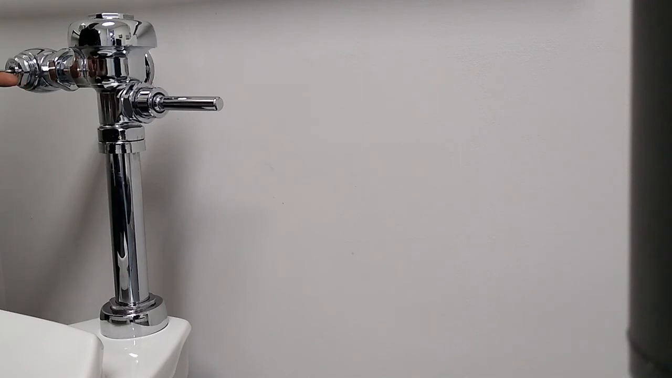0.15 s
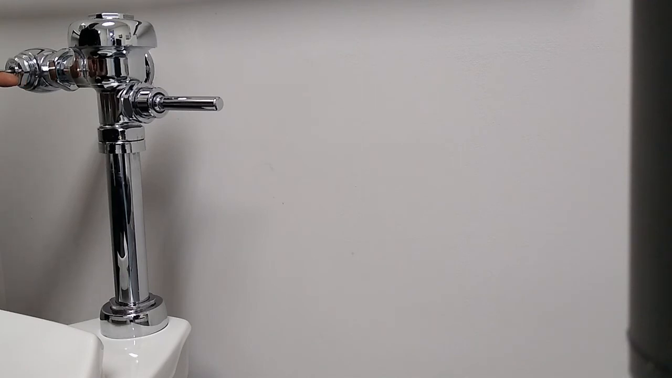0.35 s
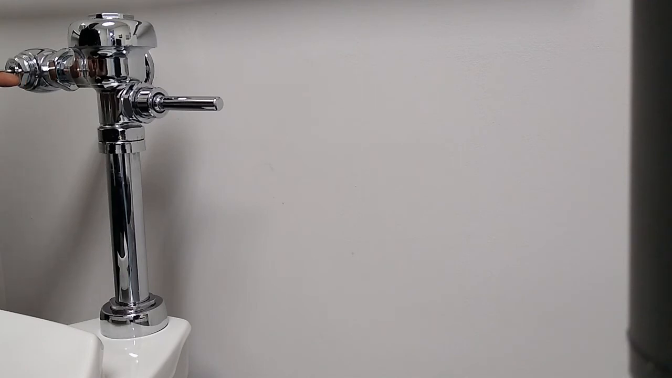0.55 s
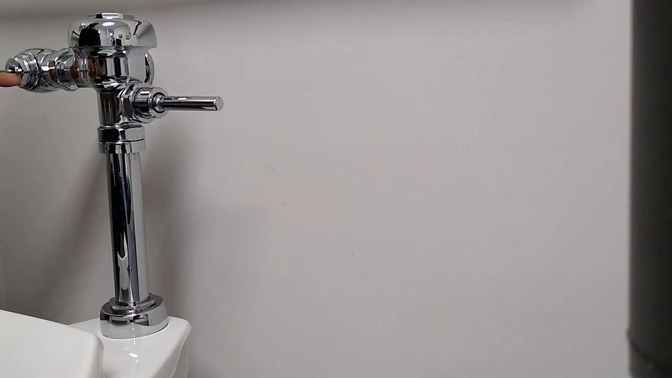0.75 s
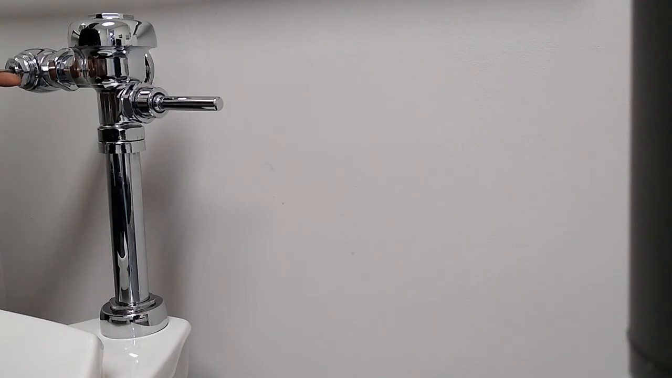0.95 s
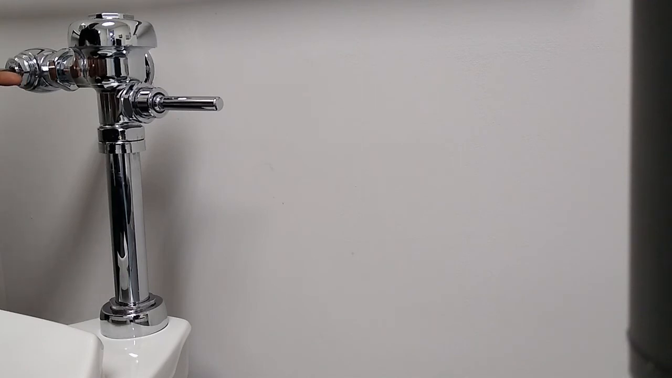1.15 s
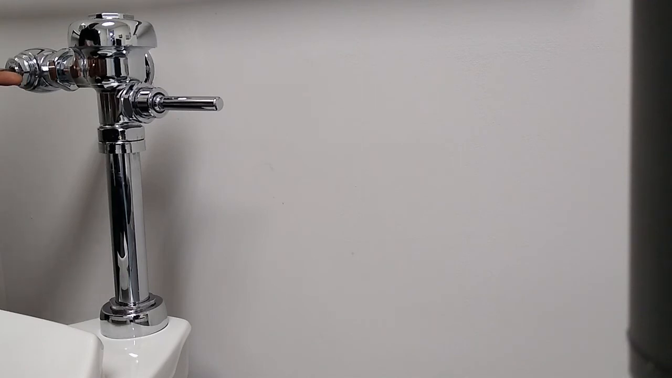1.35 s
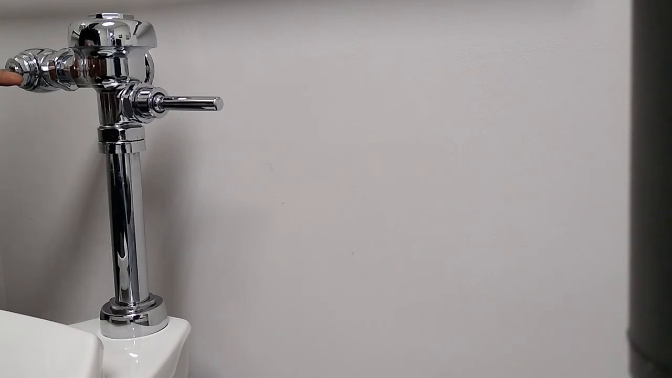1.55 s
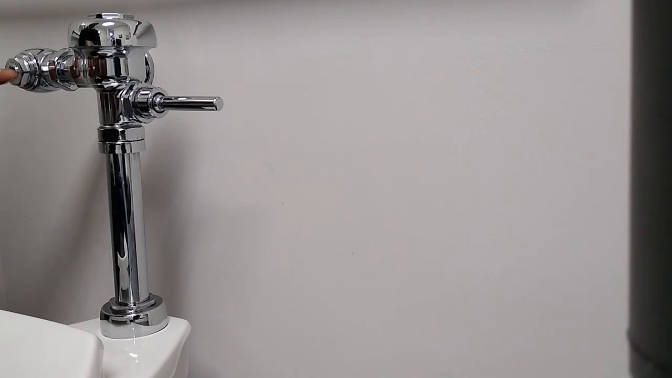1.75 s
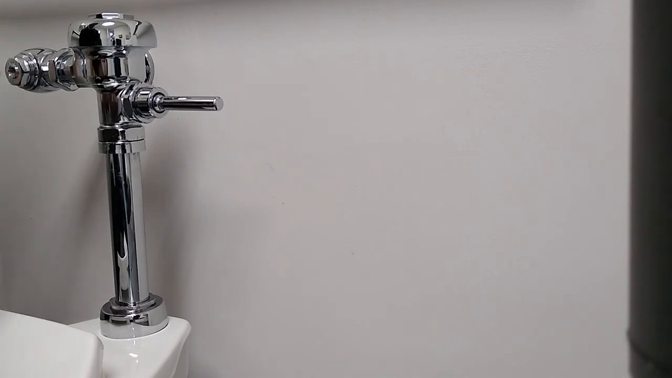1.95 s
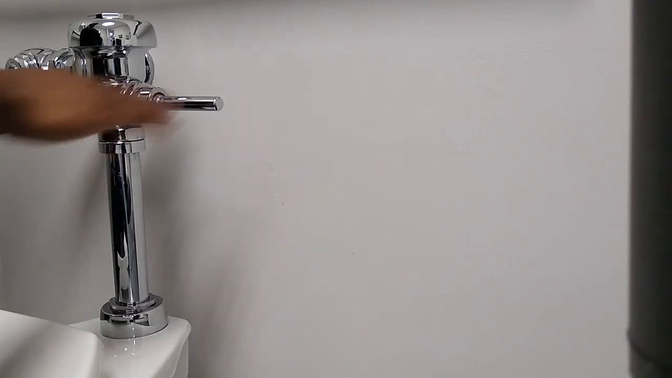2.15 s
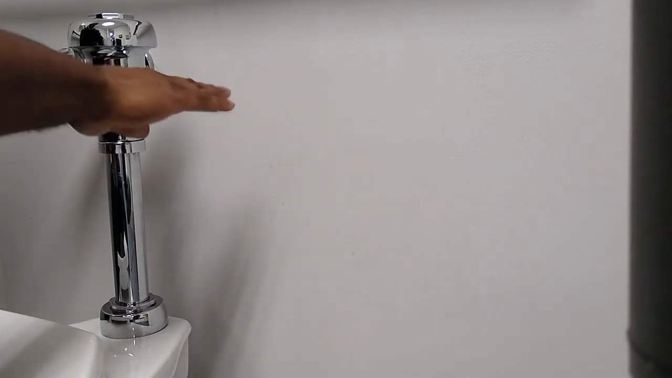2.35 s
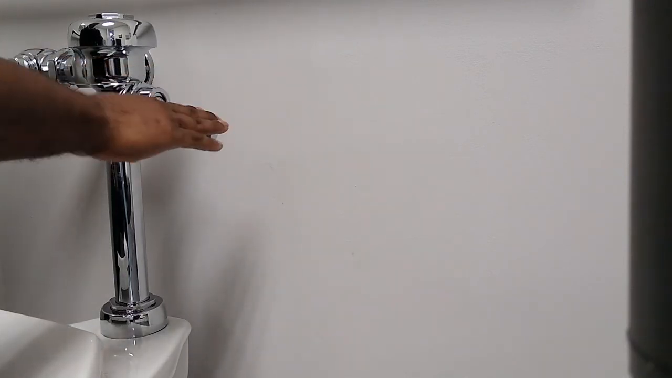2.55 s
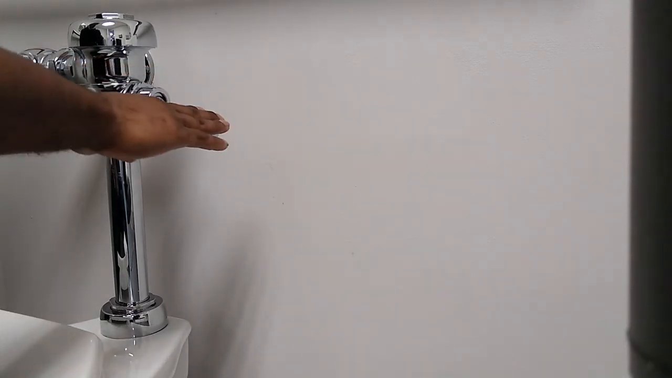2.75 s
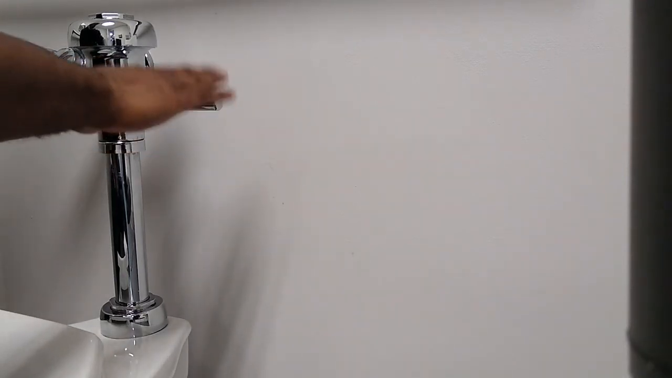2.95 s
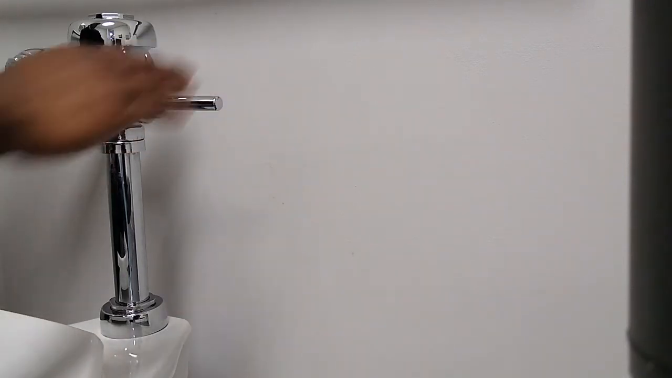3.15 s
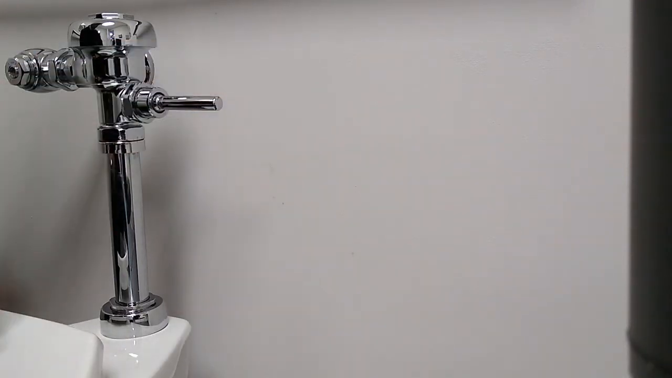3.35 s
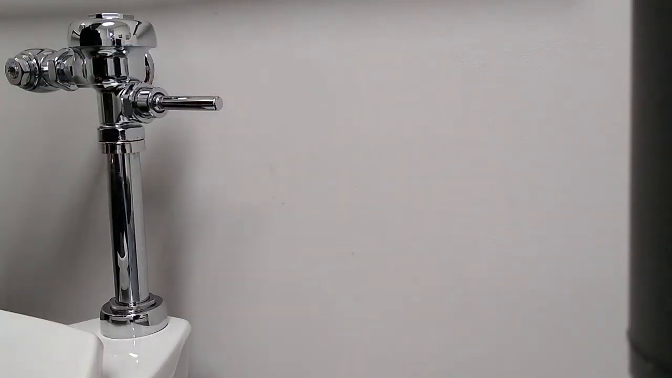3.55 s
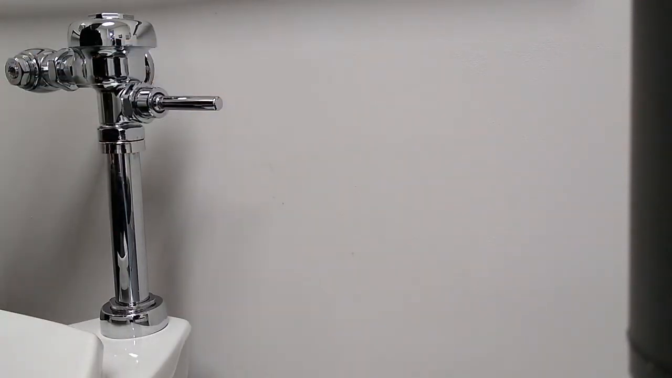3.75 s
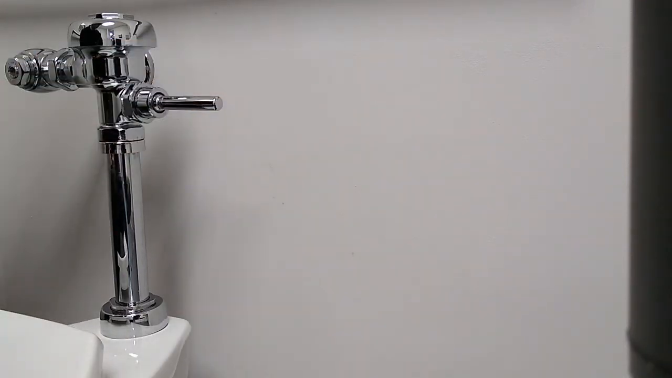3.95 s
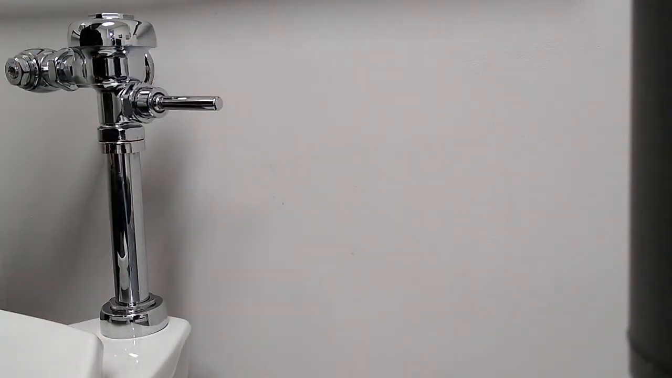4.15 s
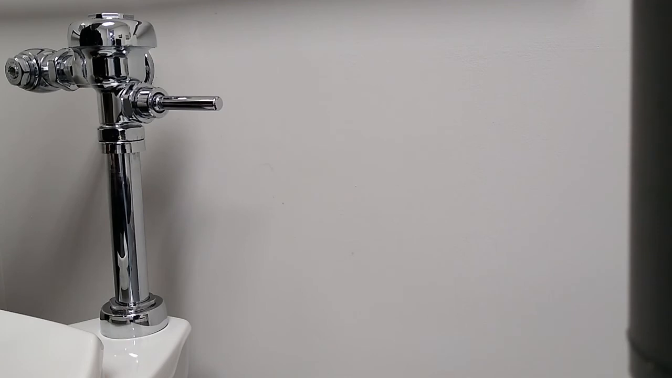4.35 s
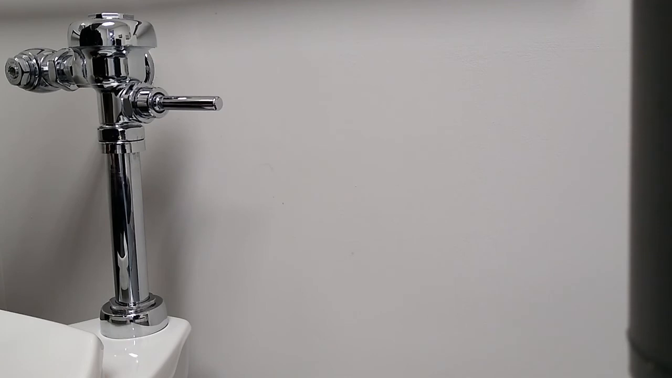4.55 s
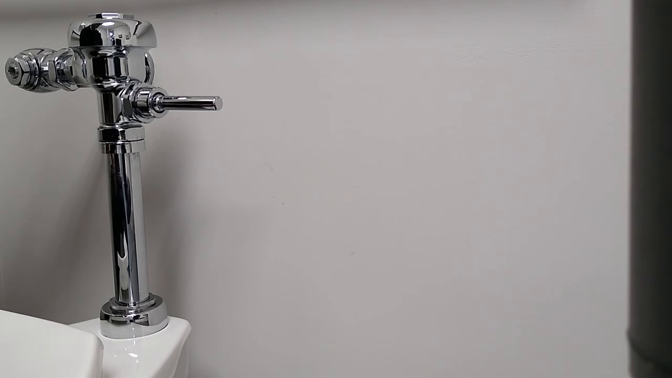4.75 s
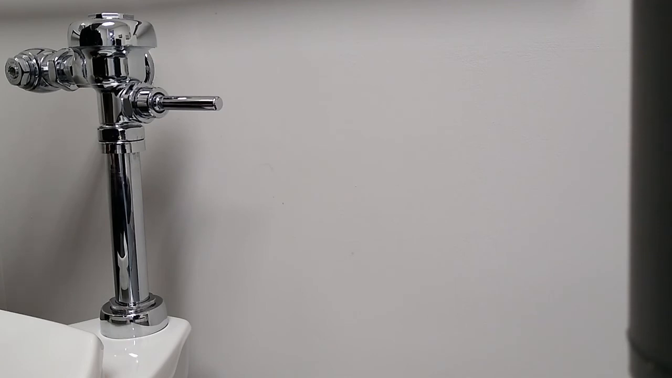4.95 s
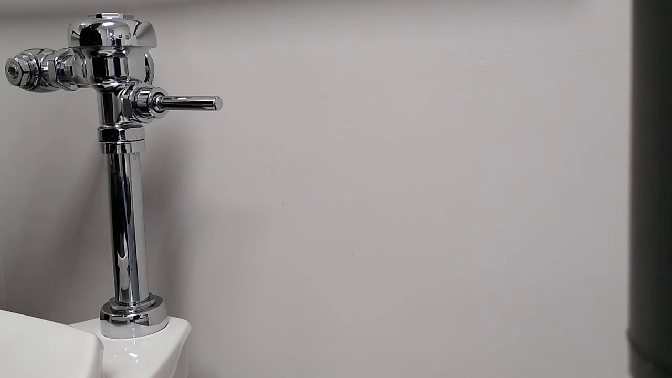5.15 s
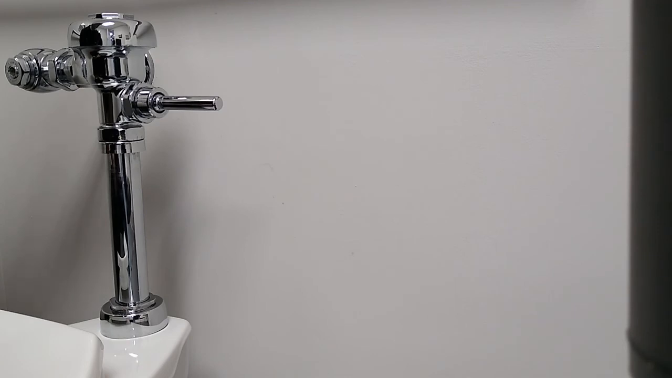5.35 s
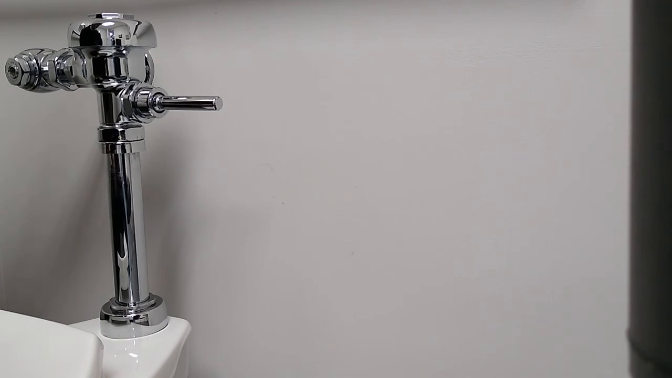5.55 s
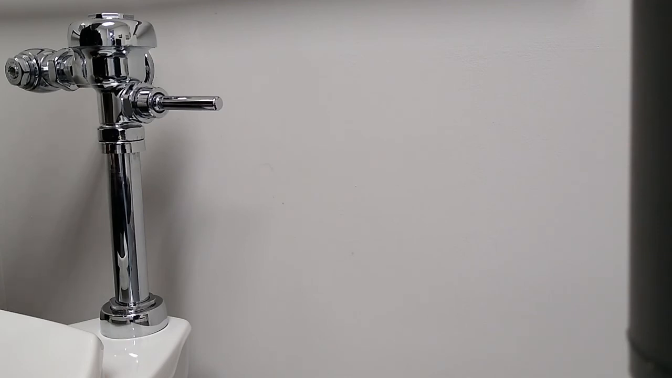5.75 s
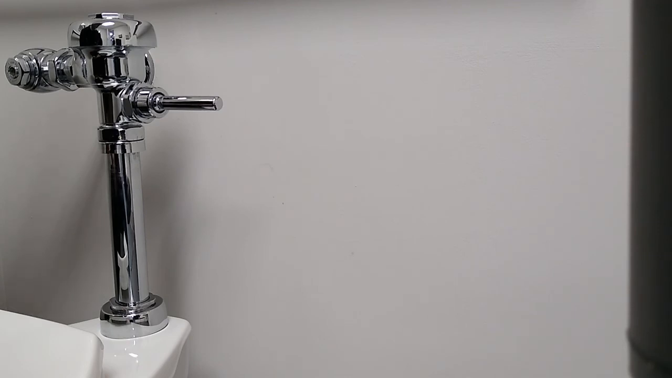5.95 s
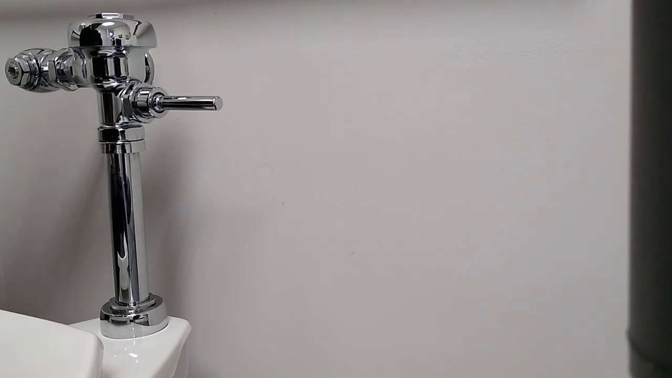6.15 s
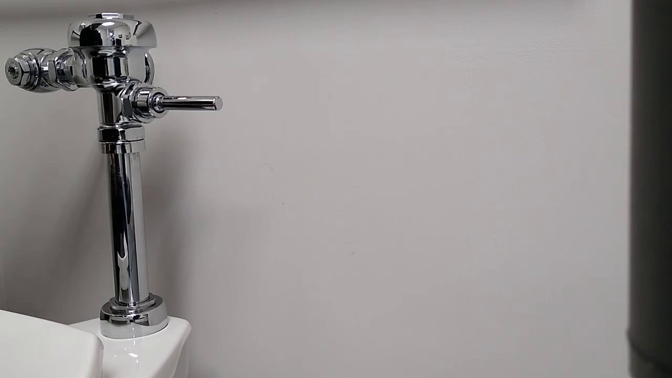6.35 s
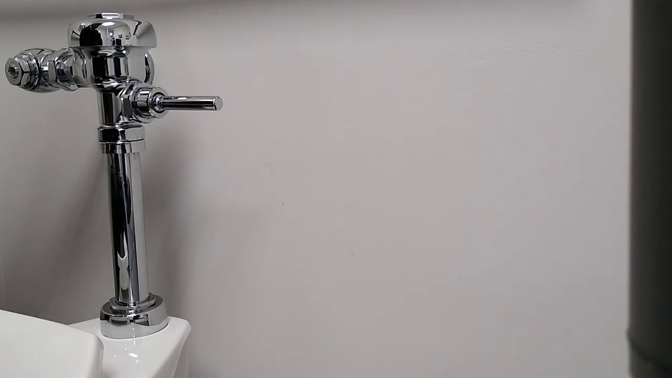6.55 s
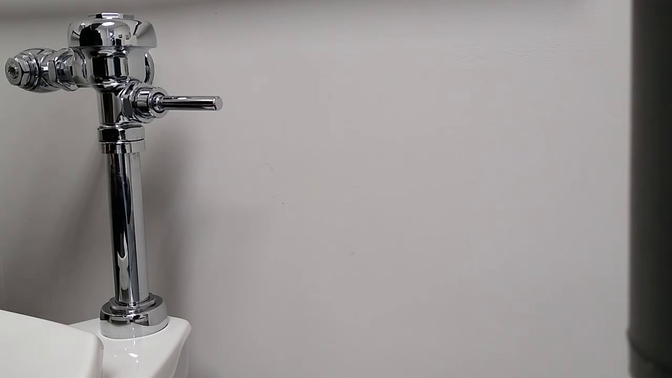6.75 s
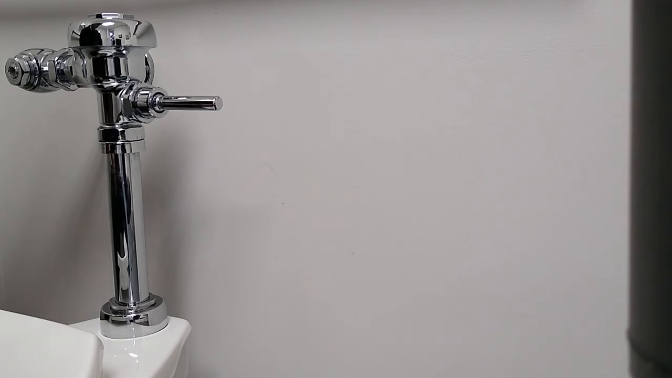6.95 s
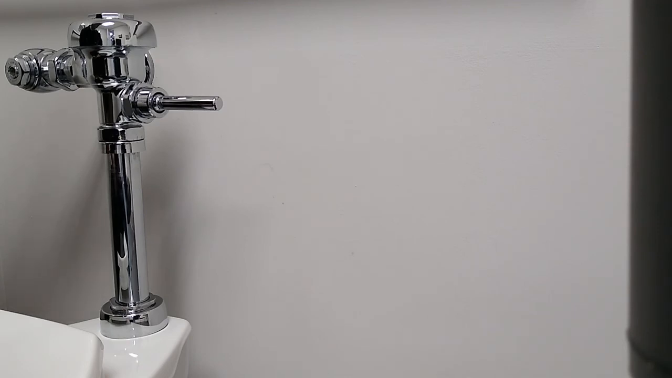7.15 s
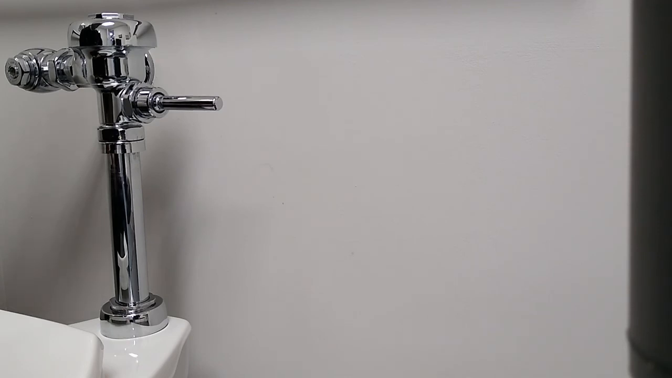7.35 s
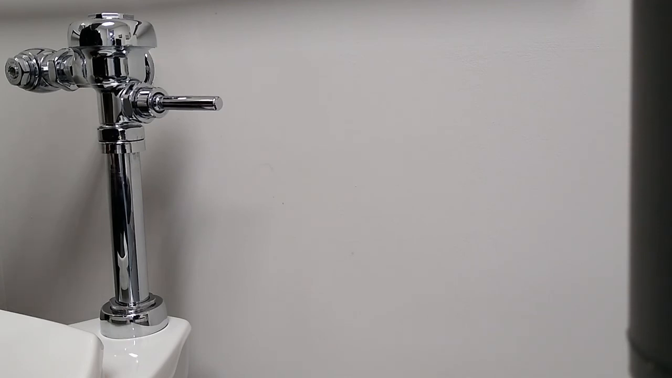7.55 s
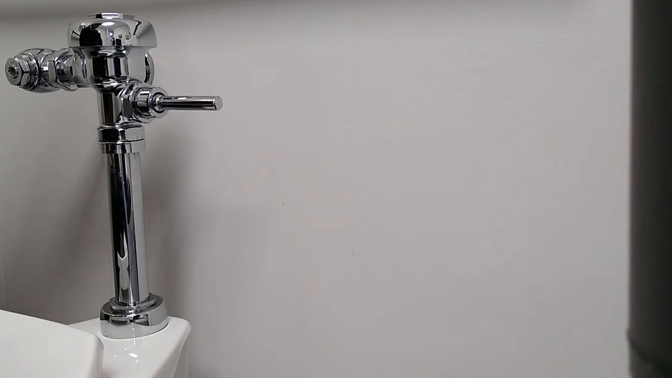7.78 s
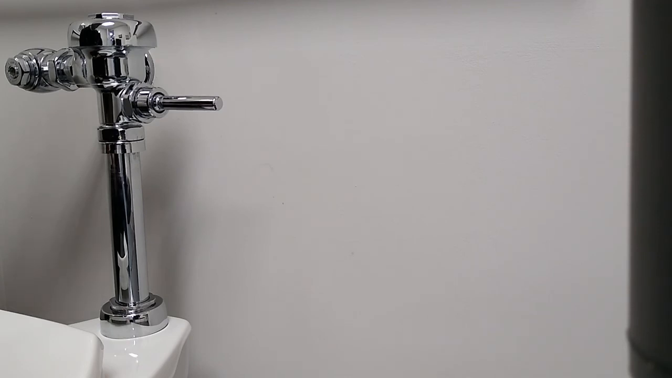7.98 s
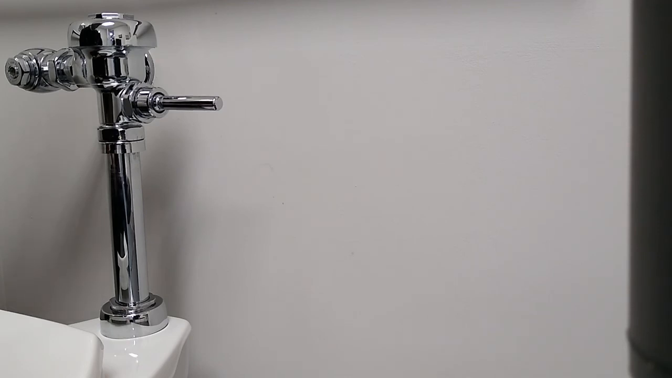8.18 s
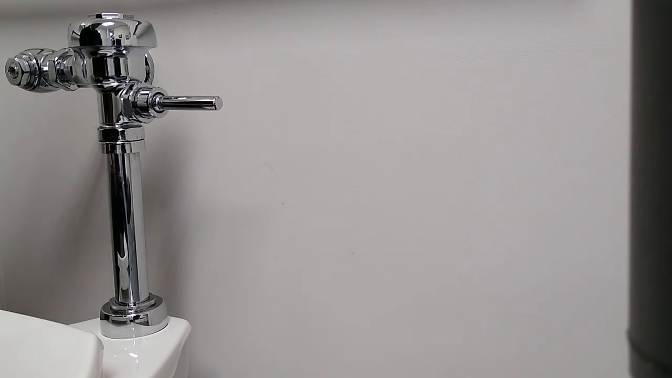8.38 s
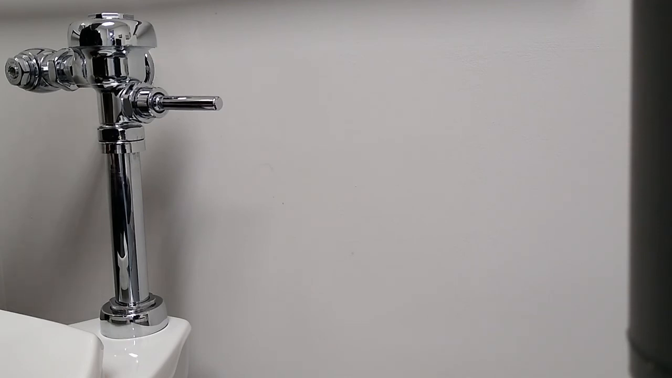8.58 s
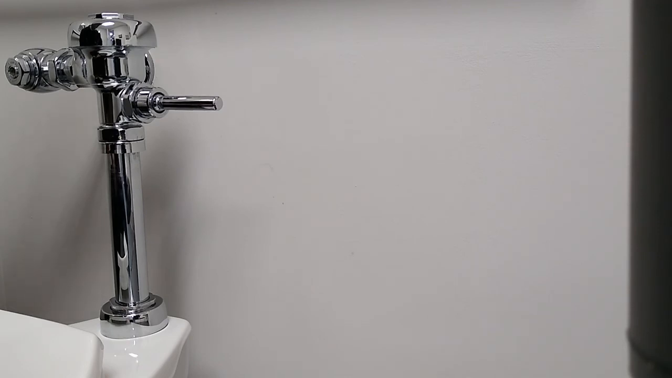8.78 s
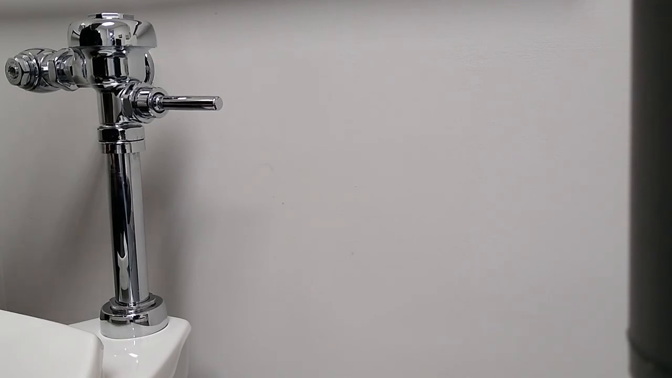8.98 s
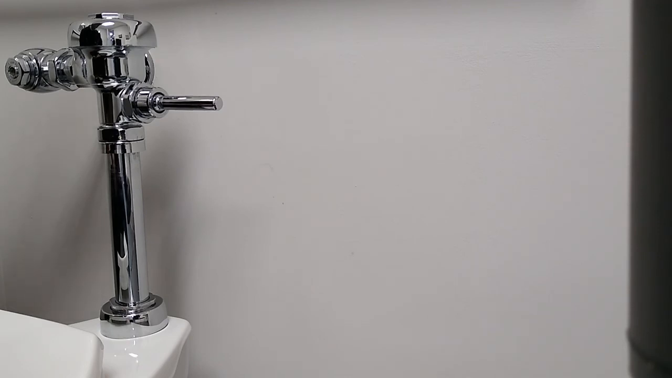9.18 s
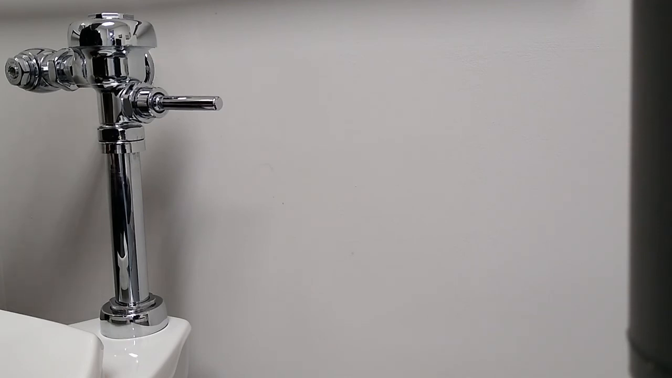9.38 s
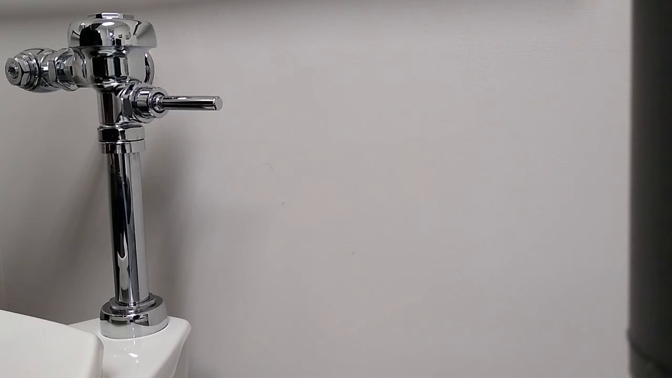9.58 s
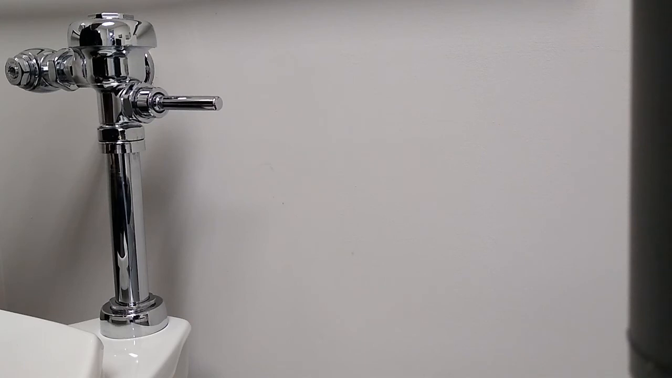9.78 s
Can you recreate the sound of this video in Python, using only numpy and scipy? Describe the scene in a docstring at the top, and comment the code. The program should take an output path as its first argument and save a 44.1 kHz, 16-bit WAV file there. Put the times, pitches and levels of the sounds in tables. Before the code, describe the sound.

A small, hard restroom heard close in stereo, with faint low ventilation. From 0 to 0.7 s a bright, thin water hiss with a wavering whistle weakens in steps as the supply stop closes, ending among tiny round bubble plops. Sharp little metal ticks at 0.75-0.95 s, then near silence; a faint tick at 1.6, a clearer one at 1.97, soft pipe thuds near 1.8 and 2.1, slight hand rustle around 2.4. At 2.72 the lever clacks; a dull slosh, deep rising gulps and a sharp spit near 2.86 lead into moderate, sputtering flow. At about 3.9 another gulp and the flush surges to a loud, dense roar: sizzling spray, bubbling splash, throbbing hollow bowl. Spits cluster at 4.2-4.4, with others near 6.4, 6.9, 8.1 and 8.3. A distinct plopping splash lands at 9.0; the slightly eased rush continues to about 9.8.

```python
"""A toilet flush valve in a small hard-walled restroom, heard at two microphones over a faint ventilation hum.
The supply stop hisses and sings (coloured noise) and is shut among single bubbles (decaying sines).
Its fittings tick (noise snaps, ringing modes), the pipes thud, a hand rustles and then presses the lever.
Trapped air gulps (gliding sines) and spits (noise bursts), water sloshes into the pipe and roars into the bowl:
bright spray, bubbling splash and the throbbing hollow of the bowl, all shaped from noise; one late splash."""
import sys
import numpy as np
from scipy import signal
from scipy.fft import rfft, irfft, next_fast_len
from scipy.io import wavfile
from scipy.ndimage import uniform_filter1d, map_coordinates

SR = 44100
rng = np.random.default_rng(int(sys.argv[2]) if len(sys.argv) > 2 else 0)


def master(y):
    """Save y as 16-bit WAV."""
    cut = np.clip(np.atleast_2d(y).T, -1, 1)
    pcm = np.round(cut * 32767)  # scale
    wavfile.write(sys.argv[1], SR, pcm.astype(np.int16))


N = 433062
TIME = np.arange(N) / SR  # s

# the valve opens, the pipe fills, the jets reach full flow and slowly ease; levels before each sound's trim:
# time_s, spray_db, splash_db, gurgle_db
FLOW_LEVELS = [(2.65, -67, -79, -84.5), (2.73, -46, -48, -51.5), (2.92, -37, -45, -46),
               (3.24, -40.5, -35, -44.5), (3.52, -39.5, -37, -48), (3.85, -40, -35.5, -38.5),
               (3.94, -29, -34.5, -38), (4.7, -25.5, -31.5, -39.5), (6.3, -25, -33, -40.5),
               (7.8, -26.5, -35.5, -43), (9.82, -26.5, -37.5, -42.5)]


def amp(db):
    """Decibels to gain."""
    return 10 ** (np.asarray(db) / 20)


def unit(x):
    """Scale to rms 1."""
    return x / np.sqrt(np.mean(x ** 2) + 1e-20)


def along(points, hz):
    """Interpolate (Hz, value) points on a log frequency axis."""
    f, v = np.transpose(points)
    return np.interp(np.log(hz + 1), np.log(f + 1), v)


def levels(rows):
    """One gain per sample for each dB column, fading to -120 dB outside the rows."""
    s, *columns = np.transpose(rows)
    knots = np.r_[s[0] - .04, s, s[-1] + .06]
    return [amp(np.interp(TIME, knots, np.r_[-120, column, -120])) for column in columns]


def wobble(rate):
    """A smooth random curve with rate knots a second."""
    knots = rng.standard_normal(int(N * rate / SR) + 4)
    return map_coordinates(knots, [TIME * rate])


def filtered(x, response):
    """Filter x by a response given as a function of frequency."""
    m = next_fast_len(N + SR // 2)
    hz = np.fft.rfftfreq(m, 1 / SR)
    return irfft(rfft(x, m) * response(hz), m)[..., :N]


def ringing(modes, hz):
    """Summed complex response of (Hz, width Hz, dB) resonances, alternating in sign."""
    total = 0
    for k, (centre, width, db) in enumerate(modes):
        damping = 1j * hz * width
        total = total + (-1) ** k * amp(db) * damping / (centre * centre - hz * hz + damping)
    return total


def colour(spectrum, modes, hz):
    """A broad spectrum with resonances standing on it."""
    return np.hypot(amp(along(spectrum, hz)), np.abs(ringing(modes, hz)))


def noise():
    """Two unrelated white noises."""
    return rng.standard_normal((2, N))


def patchy(depth_db):
    """Turbulence: noise whose strength varies in patches of time and pitch."""
    z = signal.stft(noise(), nperseg=512)[2]
    field = uniform_filter1d(rng.standard_normal(z.shape[1:]), size=7, axis=0)  # smooth over pitch
    field = uniform_filter1d(field, size=9, axis=1)  # smooth over time
    return unit(signal.istft(z * amp(depth_db * unit(field)), nperseg=512)[1][:, :N])


def placed(pair, response):
    """Colour a pair and spread it over the two microphones, rms 1; the bright valve is on the left."""
    # likeness of the two microphones: frequency_hz, correlation
    alike = [(60, 0.94), (140, 0.77), (280, 0.55), (600, 0.24), (1000, -0.11), (2200, -0.07), (6600, 0.028),
             (7600, 0.67), (11500, .87), (13000, 0.81), (15500, 0.25)]
    # balance of the microphones: frequency_hz, left_minus_right_db
    lean = [(60, -2), (110, 3.5), (200, -1), (380, 0.5), (700, 1), (1290, -3.5), (2380, -3), (4400, 1.5),
            (8120, 2.5), (15000, 8)]

    def mid_side(hz):
        turn = np.arccos(np.clip(along(alike, hz), -1, 1)) / 2
        return response(hz) * np.array([np.cos(turn), np.sin(turn)])

    mid, side = filtered(pair, mid_side)
    stereo = np.array([mid + side, mid - side])
    return unit(filtered(stereo, lambda hz: amp(np.outer([.5, -.5], along(lean, hz)))))


def burst(s, rise, t60):
    """A swell, its last 9 dB in rise seconds, up to time s, then a decay of 60 dB in t60 seconds."""
    db = np.where(TIME < s, 9 * (TIME - s) / max(rise, 1e-4), 60 * (s - TIME) / t60)
    return amp(np.maximum(db, -200))


def swells(rows, rise, t60):
    """Summed envelope of (s, dB) events that share one rise and decay."""
    return sum(amp(db) * burst(s, rise, t60) for s, db in rows)


def ventilation():
    """A faint fan rush: noise with duct resonances, and two wavering sines of motor hum."""
    # motor hum: pitch_hz, level_db (rms, centre of its wobble)
    motor = [(59.2, -77.5), (134.6, -80.5)]
    # fan rush: frequency_hz, density_db (relative, per Hz)
    rush = [(20, 4), (60, 2), (100, -6.5), (135, -11.5), (180, -14.5), (240, -11), (290, -18.5),
            (350, -13.5), (450, -23), (750, -26), (1200, -34), (2000, -34), (4000, -39.5), (15500, -41.5)]
    # duct resonances: centre_hz, width_hz, level_db (relative)
    duct = [(235.6, 6, -2), (354.5, 7.8, -3.5), (523, 6, -14), (734, 6, -12.5), (1890, 25, -23.5)]
    drift = .3 * wobble(2)  # radians
    hum = 0
    for hz, db in motor:
        level = np.sqrt(2) * amp(db + 1.5 * wobble(3.2))
        hum = hum + level * np.sin(2 * np.pi * hz * TIME + drift)
    return hum + amp(-65.5) * placed(noise(), lambda hz: colour(rush, duct, hz))


def supply_stop():
    """Water squeezes through the closing stop as hissing noise and sings unsteadily in the metal body."""
    # the stop is screwed shut: time_s, hiss_db (before the jet's trim)
    closing = [(0, -33.5), (.36, -36.5), (.49, -43.5), (.58, -47), (.71, -79)]
    # jet noise: frequency_hz, density_db (relative, per Hz)
    jet_spectrum = [(1750, -46), (2300, -16), (3800, -7.5), (5000, -7.5), (6800, -9), (9500, -7),
                    (11500, -2), (12800, -9), (14000, -8.5), (15500, -5.5)]
    # resonances on the jet: centre_hz, width_hz, level_db (relative)
    jet_modes = [(2280, 1000, -8), (4780, 360, -1.5), (5500, 480, -4), (8830, 200, -3.5), (11150, 250, 2),
                 (11800, 200, -5), (12700, 200, 5), (13550, 150, -4.5)]
    # whistling resonances, each passed twice: centre_hz, width_hz (of one pass), level_db (relative)
    whistle_modes = [(540, 90, -13), (840, 160, -9.5), (1285, 170, 2)]
    whistle_db, whistle_follows = -33, .7  # centre level for a tabled hiss of 0 dB; its dB per dB of hiss

    def jet_response(hz):
        low_cut = hz ** 16 / (hz ** 16 + 2000 ** 16)
        return colour(jet_spectrum, jet_modes, hz) * low_cut

    def whistle_response(hz):
        return sum(amp(db) * ringing([(c, w, 0)], hz) ** 2 for c, w, db in whistle_modes)

    hiss, = levels(closing)
    jet = placed(patchy(depth_db=2.3), jet_response)
    tone = placed(patchy(depth_db=4.0), whistle_response)
    whistle = amp(whistle_db + 3.2 * wobble(30)) * hiss ** whistle_follows
    return amp(2) * hiss * jet + whistle * tone


def plops():
    """Single bubbles, as the stop closes and in the bowl, ring briefly as sines at a wavering pitch."""
    # time_s, pitch_hz, peak_db (before flutter), t60_s
    bubble_rows = [(.06, 526, -61, 0.16), (.175, 320, -57, 0.19), (.52, 1710, -55, 0.24),
                   (.54, 1280, -56, 0.2), (.555, 540, -60, .25), (.58, 340, -59, .2),
                   (.652, 2220, -69, .22), (.66, 860, -75, .25), (.725, 527, -66, 0.31),
                   (8.98, 2080, -30, .07), (8.984, 1530, -28.5, 0.069)]
    flutter_db, waver = 2 * wobble(74), 1.0 * wobble(120)  # waver in radians
    out = 0
    for s, hz, db, t60 in bubble_rows:
        out = out + amp(db + flutter_db) * burst(s, 0.0072, t60) * np.sin(2 * np.pi * hz * TIME + waver)
    return out


def ticks():
    """Each small sound cracks, snaps and rings one region of the valve body's modes; the room adds a tail."""
    # metal fittings and lever, with a hand rustle at 2.33 and 2.42 s:
    # time_s, snap_db, ring_db, centre_hz, width_octaves, t60_s (snap takes half)
    tick_rows = [(.727, -64, -68, 13000, .08, .06), (.754, -51, -62, 12900, .08, .06),
                 (.822, -60, -66, 6240, .13, 0.2), (.948, -71, -77, 13300, 0.62, 0.11),
                 (1.61, -79, -65.5, 2070, .28, .1), (1.965, -53.3, -59, 7000, 0.74, 0.25),
                 (2.33, -82, -79, 11500, .2, .2), (2.42, -75, -76, 13000, .16, .5),
                 (2.572, -65, -68, 11100, 0.37, .15), (2.657, -60, -56, 3200, 0.44, .2),
                 (2.719, -41, -44, 3600, .8, .08)]
    # modes of the chrome valve body: pitch_hz, level_db (relative), t60_s
    metal = [(1860, 4, 0.25), (2471, -1.5, 0.21), (3100, -15.5, 0.19), (4200, 4, 0.17), (5180, 1, 0.14),
             (5860, -7.5, 0.12), (7170, -5, .25), (8700, 1.5, .13), (11000, 3, .14), (12800, 0, .16)]
    crack_db, crack_t60_s = 4, 0.0041  # the first instant of each sound, over its snap
    waver_rad, waver_rate = 0.65, 180  # roughness of the ring: depth, knots a second
    white = noise()
    t = np.arange(SR // 2) / SR
    waver = waver_rad * wobble(waver_rate)[:len(t)]
    out = np.zeros((2, N))
    for s, snap_db, ring_db, centre_hz, octaves, t60 in tick_rows:
        region = lambda hz: np.exp(-.5 * (np.log2((hz + 1) / centre_hz) / octaves) ** 2)
        crack = amp(crack_db) * burst(s, 0.00027, crack_t60_s)
        snap = burst(s, .0003, t60 / 2)
        tail = 0.27 * burst(s, .002, 0.45)
        out += amp(snap_db) * (crack + snap + tail) * unit(filtered(white, region))
        ring = 0
        for hz, db, life in metal:
            turns = hz * t + rng.uniform(size=(2, 1))  # random phase at each microphone
            ring = ring + region(hz) * amp(db - 60 * t / life) * np.sin(2 * np.pi * turns + waver)
        onset = 1 - np.exp(-t / .003)
        out[:, round(s * SR):][:, :len(t)] += amp(ring_db) * ring * onset
    return out


def plumbing():
    """Low noise: the pipes thud when handled or hit by a surge, and tremble with the flow."""
    # low thuds: time_s, level_db
    thuds = [(1.77, -58.5), (2.11, -50), (2.4, -61), (2.76, -47), (2.87, -42), (3.05, -46), (3.24, -45.5),
             (3.61, -52), (3.96, -47), (8.37, -53), (9.25, -49)]
    # pipe rumble: frequency_hz, density_db (relative, per Hz)
    rumble_spectrum = [(15, -12), (40, -3), (60, 9.5), (95, -8), (135, -1), (170, -14), (260, -33),
                       (600, -60)]
    tremble_db = -33.5  # centre level, relative to the tabled spray
    rumble = placed(noise(), lambda hz: amp(along(rumble_spectrum, hz)))
    tremble = amp(tremble_db + 2.1 * wobble(6.5)) * levels(FLOW_LEVELS)[0]
    return np.hypot(tremble, swells(thuds, rise=.06, t60=.55)) * rumble


def droplets(count, spread_db):
    """Tiny impacts of differing size at random times."""
    at = rng.integers(0, N, count)
    size = amp(spread_db * rng.uniform(size=count))
    return unit(np.array([np.bincount(at, size * rng.standard_normal(count), N) for _ in range(2)]))


def bubbles(count, centre_hz, spread, cycles):
    """Each bubble rings for a few cycles at the pitch of its size."""
    t = np.arange(SR // 100) / SR
    hz = centre_hz * np.exp(spread * rng.standard_normal((count, 1)))
    age = t * hz / cycles
    ring = np.sin(2 * np.pi * hz * t) * np.exp(-age) * (1 - np.exp(-10 * age))
    at = (rng.integers(0, N, (count, 1)) + np.arange(len(t))).ravel()
    sides = []
    for _ in range(2):
        strength = rng.standard_normal((count, 1))
        sides.append(np.bincount(at, (ring * strength).ravel(), N)[:N])
    return unit(np.array(sides))


def flush():
    """Rim jets spray the china and churn the pool; one unsteady flow drives all three noises."""
    # spectra: frequency_hz, density_db (relative, per Hz)
    spray_spectrum = [(2000, -36.5), (4500, -9.5), (6000, -5.5), (7500, -5), (9500, -3), (11000, -0.5),
                      (12500, -1.5), (14000, -4.5), (15500, -8.5)]
    splash_spectrum = [(800, -21), (1400, -7.5), (2200, 1.5), (3500, 1.5), (4500, 0), (6000, -3),
                       (8000, -14), (15000, -45)]
    gurgle_spectrum = [(200, -33), (330, -9), (405, -17), (520, -5), (750, -7), (1000, -2.5), (1150, -17.5),
                       (1400, -3.5), (2000, -5.5), (4000, -39)]
    # resonances: centre_hz, width_hz, level_db (relative)
    splash_modes = [(1856, 25, -3), (2058, 50, -4), (2205, 30, 0), (2830, 55, -1), (3078, 60, -2),
                    (3366, 38, -1)]
    gurgle_modes = [(531.7, 14.5, 6), (625, 73, -0.5), (695, 26, 5.5), (786.5, 12.7, 6.5), (944, 130, -1.5),
                    (1290, 40, 4), (1442, 8.9, 3.5)]
    spray, splash, gurgle = levels(FLOW_LEVELS)
    surge = 0.13 * wobble(14) + 0.83 * wobble(45)  # dB
    mist = patchy(depth_db=1.3) + .45 * droplets(count=50000, spread_db=13)
    fizz = .25 * bubbles(count=10000, centre_hz=3000, spread=.55, cycles=4)
    churn = patchy(depth_db=1.2) + fizz
    pool = patchy(depth_db=1.7)
    spray_sound = placed(mist, lambda hz: amp(along(spray_spectrum, hz)))
    splash_sound = placed(churn, lambda hz: colour(splash_spectrum, splash_modes, hz))
    gurgle_sound = placed(pool, lambda hz: colour(gurgle_spectrum, gurgle_modes, hz))
    return (spray * amp(1.6 + surge + 1.1 * wobble(65)) * spray_sound
            + splash * amp(4.0 + surge + 0.77 * wobble(32)) * splash_sound
            + gurgle * amp(4.0 + surge) * gurgle_sound)


def bowl():
    """Resonant noise: the hollow bowl throbs with the churning pool and glugs; the trapway drones with the flow."""
    # hollow of the bowl: centre_hz, width_hz, level_db (relative)
    hollow_modes = [(211.7, 12.8, 1), (245, 27, -10), (298, 19, -10)]
    # the strongest glugs: time_s, level_db
    glugs = [(2.99, -38), (3.25, -52), (3.91, -30), (4.17, -30), (4.44, -35), (4.66, -33), (6.03, -34),
             (6.35, -36), (6.45, -36.5), (7.14, -34), (7.3, -36), (7.49, -33.5), (7.92, -32.5), (8.46, -39),
             (8.94, -37), (9.13, -30.5)]
    hollow_db, hollow_follows = 15, 1.357  # centre level for a tabled gurgle of 0 dB; its dB per dB of gurgle
    throb_db, throb_rate = 3.6, 24  # random throbbing: depth, knots a second
    trap_db = -27.5  # relative to the tabled spray

    def hollow_response(hz):
        high_cut = 1 / (1 + (hz / 350) ** 8)
        low_cut = hz ** 4 / (hz ** 4 + 150 ** 4)
        return ringing(hollow_modes, hz) * high_cut * low_cut

    spray, _, gurgle = levels(FLOW_LEVELS)
    drone = placed(noise(), hollow_response)
    trap = placed(noise(), lambda hz: ringing([(130.0, 47, 0)], hz) ** 2)
    throb = amp(hollow_db + throb_db * wobble(throb_rate)) * gurgle ** hollow_follows
    return np.hypot(throb, swells(glugs, rise=0.017, t60=0.26)) * drone + amp(trap_db) * spray * trap


def gulps():
    """Trapped air swells and fades as a sine, gliding in pitch as water squeezes and jostles its pocket."""
    # start_s, length_s, first_hz, last_hz (before jostling), peak_db (before flutter)
    pockets = [(2.678, .06, 600, 430, -42.5), (2.855, 0.073, 123.8, 175, -28.5),
               (2.899, 0.082, 165.3, 217, -35), (2.96, .075, 216.5, 238, -31.5), (3.86, .03, 600, 483, -36),
               (3.878, 0.11, 335, 293, -34), (8.898, 0.036, 2780, 3600, -37)]
    jostle = 1 + .07 * wobble(170)  # random share of the pitch
    flutter = amp(2.5 * wobble(110))
    out = np.zeros(N)
    for s, length, first_hz, last_hz, db in pockets:
        age = np.clip((TIME - s) / length, 0, 1)
        pitch = (first_hz + (last_hz - first_hz) * age) * jostle
        out += amp(db) * np.sin(np.pi * age) * np.sin(2 * np.pi * np.cumsum(pitch) / SR)
    return flutter * out


def inrush():
    """The first water slams into the empty pipe and tumbles down it: one dull slosh of noise."""
    # slosh: frequency_hz, density_db (relative, per Hz)
    slosh = [(50, -9), (105, 2), (250, -2.5), (330, -9), (550, -8), (900, -25), (2000, -60)]
    lever_s = 2.715  # the valve opens
    opened = np.clip((TIME - lever_s) / .01, 0, 1)
    envelope = amp(-34.5) * opened * burst(2.825, rise=.11, t60=.35)
    return envelope * placed(noise(), lambda hz: amp(along(slosh, hz)))


def spits():
    """Air spits out of the jets with the water, and one splash at 8.98 s: sharp noise hiss and lower spatter."""
    # time_s, peak_db (hiss), spatter_db (over the hiss, before its trim), rise_s, t60_s
    spit_rows = [(2.719, -35.5, 9.5, 0.00031, 0.095), (2.864, -19, -8, 0.0051, 0.15),
                 (2.974, -26.5, 3.5, 0.012, 0.35), (3.089, -28.5, -12, 0.004, 0.087),
                 (3.25, -27, -20, 0.041, 0.45), (3.435, -33, 3, 0.0072, 0.11),
                 (4.196, -21.5, 5, 0.0029, 0.1), (4.314, -22, 1, .003, 0.13), (4.381, -24, 6, .002, 0.094),
                 (4.408, -25.5, 2, .004, 0.16), (6.365, -22, -5, .01, 0.12), (6.442, -24.5, 3, .003, 0.12),
                 (6.894, -18.5, -31, .002, 0.068), (8.109, -15, -14, .0003, .012),
                 (8.328, -20, -20, .006, 0.078), (8.98, -40, 16.5, 0.022, 0.19)]
    hiss = sum(amp(db) * burst(s, rise, t60) for s, db, low_db, rise, t60 in spit_rows)
    spatter = sum(amp(db + low_db) * burst(s, rise, t60) for s, db, low_db, rise, t60 in spit_rows)
    # (Hz, relative dB per Hz)
    sharp = [(2000, -33), (6000, 4.5), (11000, 4.0), (15500, -0.5)]
    low = [(200, -6.5), (700, -5.0), (3000, 5), (6000, 2.5), (12000, -38)]
    return (hiss * placed(noise(), lambda hz: amp(along(sharp, hz)))
            + amp(-4.0) * spatter * placed(noise(), lambda hz: amp(along(low, hz))))


def walls(x, count):
    """Nearby tile and china return weak early copies that comb the treble."""
    copy_db, near_s, far_s, low_cut_hz = -18.5, .0012, .012, 1385  # each copy against the direct sound
    treble = filtered(x, lambda hz: hz ** 4 / (hz ** 4 + low_cut_hz ** 4))
    delays = np.abs(rng.uniform(near_s, far_s, count) * SR).astype(int)
    copies = sum(np.pad(treble, ((0, 0), (d, 0)))[:, :N] for d in delays)
    keep_power = np.sqrt(1 + count * amp(copy_db) ** 2)
    return x - treble + (treble + amp(copy_db) * copies) / keep_power


def scene():
    """All sources at the two microphones, the bright ones combed by the walls."""
    bright = walls(supply_stop() + ticks() + flush() + spits(), count=10)
    return bright + plops() + inrush() + bowl() + plumbing() + gulps() + ventilation()


def record(dry):
    """The recorder cuts off steeply above its band limit."""
    top_hz = 15560
    return filtered(dry, lambda hz: 1 / (1 + (hz / top_hz) ** 300))


dry = scene()
out = record(dry)
master(out)
```